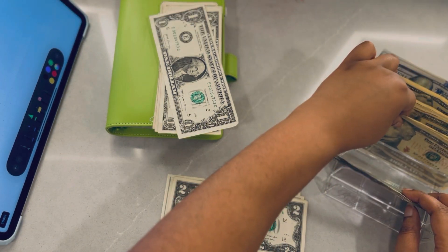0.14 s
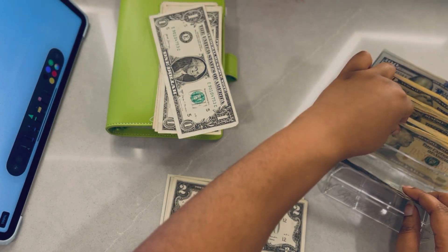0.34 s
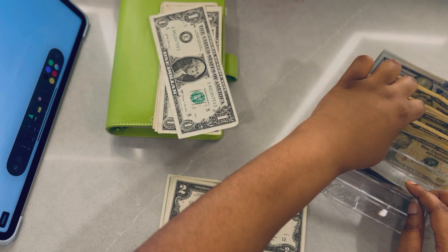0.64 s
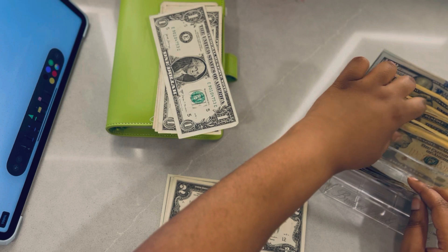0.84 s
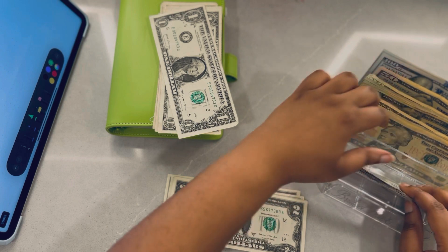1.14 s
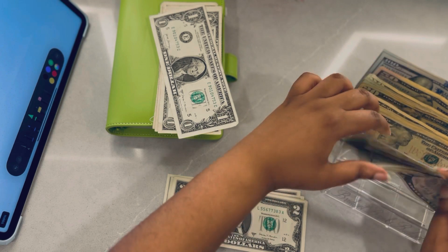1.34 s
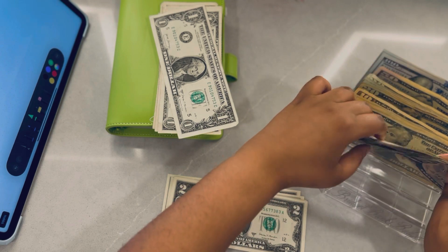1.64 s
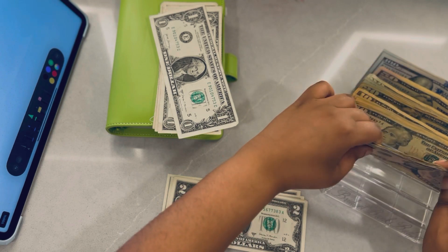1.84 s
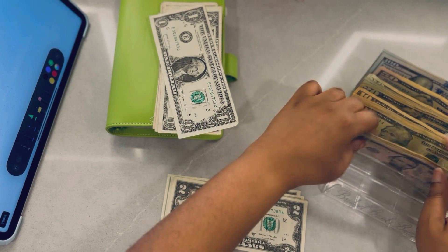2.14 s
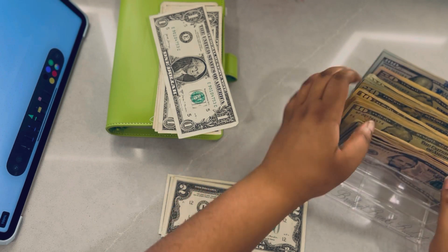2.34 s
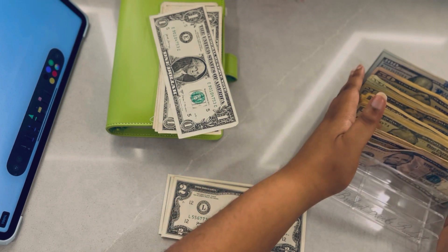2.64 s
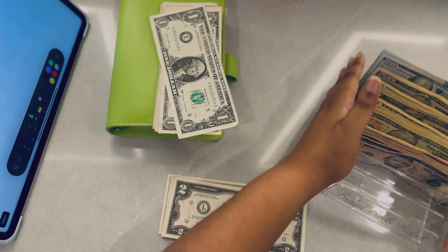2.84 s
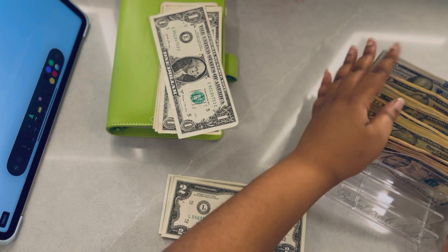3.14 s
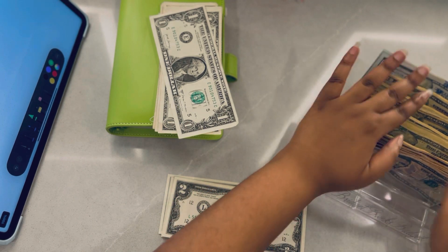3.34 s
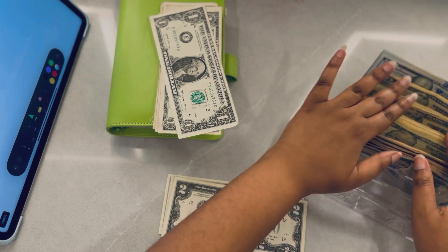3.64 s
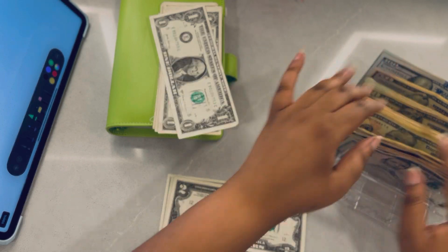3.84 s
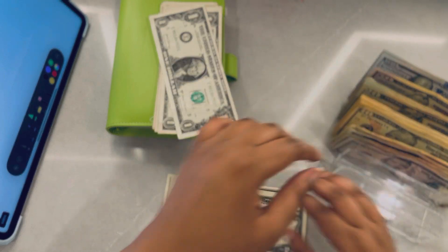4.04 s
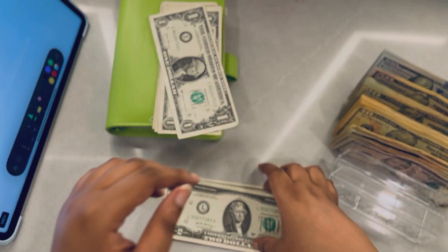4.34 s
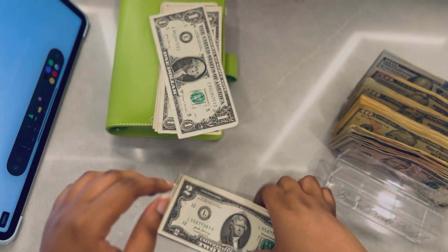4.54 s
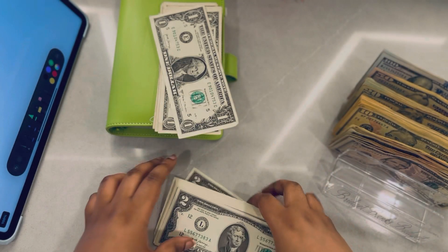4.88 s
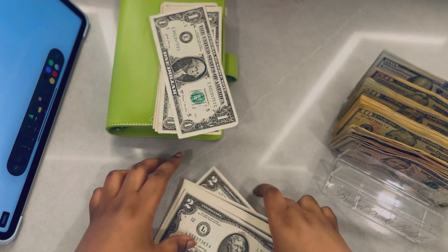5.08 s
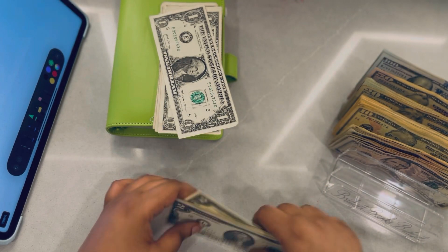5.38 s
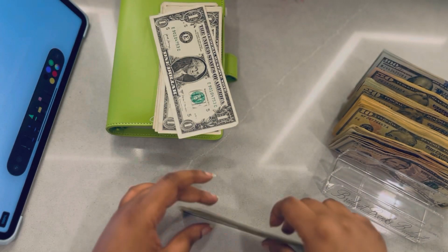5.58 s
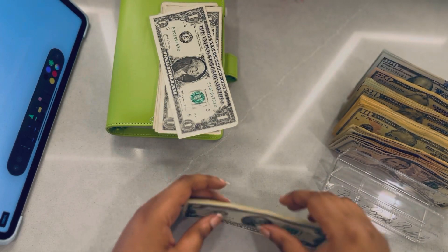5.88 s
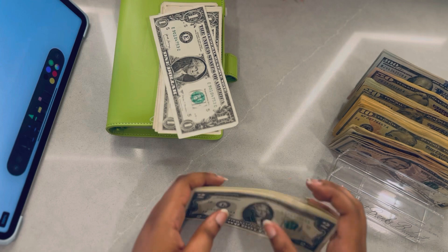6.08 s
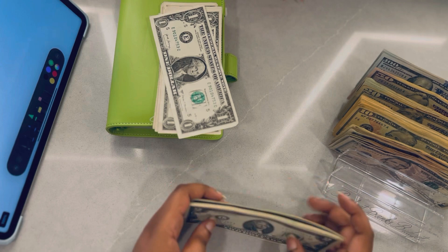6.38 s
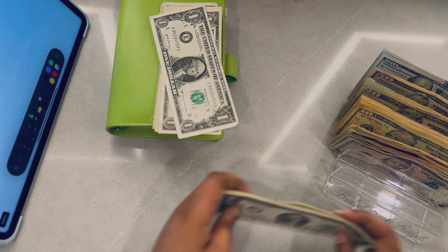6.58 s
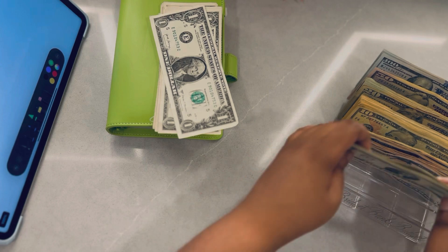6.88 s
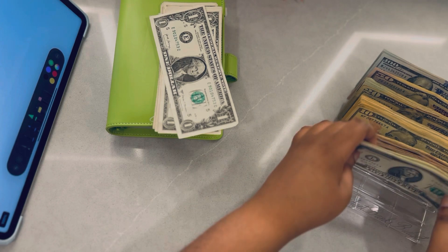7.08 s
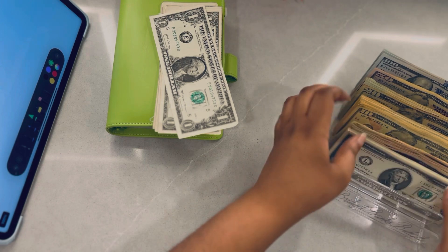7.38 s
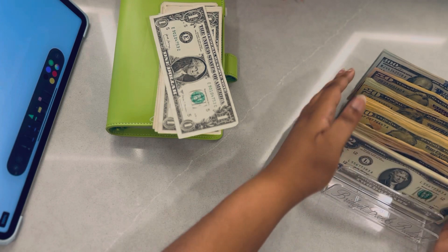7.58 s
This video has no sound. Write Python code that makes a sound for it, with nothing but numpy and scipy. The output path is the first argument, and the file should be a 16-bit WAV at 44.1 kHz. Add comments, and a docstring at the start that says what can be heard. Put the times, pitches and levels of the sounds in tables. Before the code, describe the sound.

A close stereo pickup in a bare, hard room with under a second of bright reverberation; a faint, low mains hum and still air run throughout. From 0 to 1.7 s there are only very soft paper slides and tiny ticks. A dull plastic knock comes at 1.8 s, then a sharp click at 2.15 s with the tray ringing briefly. Light paper brushes follow at 2.5-3 s, then distinct tray clicks at about 3.45 and 3.63 s. After a lull, soft thuds and quick papery flicks begin at 4.2 s, with a hollow stack tock at 5.03 s, a rustle at 5.3 s and a crisp snap cluster at 5.6 s. Fine crinkles and small flicks run from 5.9 to 6.5 s, then near quiet. At 7.19 s the loudest crack hits the plastic, with a thud, a paper slide and a fading ring.

```python
"""Sorting banknotes by hand

Banknotes are sorted on a hard counter in a bare, ringing room. Nails and note edges crack against a
plastic tray and set its walls ringing; notes snap in short noise bursts, and their stack gives a hollow tock.
Sliding paper rustles in swells of grainy noise with tiny crinkles. Hands bump the counter with soft
thuds, and an appliance hums faintly over the still air."""
import sys
import numpy as np
from scipy import signal
from scipy.fft import rfft, irfft, next_fast_len
from scipy.io import wavfile
from scipy.ndimage import uniform_filter1d, map_coordinates

SR = 44100
rng = np.random.default_rng(int(sys.argv[2]) if len(sys.argv) > 2 else 0)


def wrap_up_sound(samples):
    """Save the sound to the file named by the first command line argument, as 16-bit audio."""
    columns = np.atleast_2d(samples).T
    # keep every value between -1 and 1, then stretch to whole-number steps
    tamed = np.clip(columns, -1, 1)
    steps = np.round(tamed * 32767).astype(np.int16)
    wavfile.write(sys.argv[1], SR, steps)


N = 340405  # length in samples

# Nails and note edges on the tray: start_s, strength_db, knock_db, edge_db, crisp_db (these three
# against the strength), sizzle_db (over crisp), body_hz, rise_s, decay_s (to -60 dB),
# ring_db (low where a hand damps the walls), room_db (high where the blow faces away).
# Levels are relative; the function adds its own gains.
TRAY_HITS = [(1.8, -33.5, 2.5, -5.5, -5.5, 2, 710, 0.002, 0.022, -12, -0.88),
             (2.103, -51.5, -1, 0.5, 4, 19.5, 1100, 0.0028, 0.016, 8.5, 0),
             (2.1461, -25.5, -10.5, -4.5, 1, 16, 850, 0.0015, 0.041, 0, -1.3),
             (2.154, -28.5, 1.5, 10, 11, 4, 2030, 0.0021, .016, -3.5, -3.1),
             (3.283, -45.5, -7, .5, -8.5, 14.5, 1080, 0.004, 0.022, -1, 0.14),
             (3.4349, -36, -10, -2.5, -9, 0.5, 1880, 0.0017, 0.036, 5, -1),
             (3.446, -23.5, -9.5, -7, 3, 5, 1280, .0014, .02, -11, -1.6),
             (3.6307, -32, -4.5, 2.5, 3.5, 5.5, 2510, 0.0022, 0.03, 0, -1.7),
             (3.733, -42.5, -0.5, 0, -16, -1, 1580, 0.0029, 0.023, -1.5, -1),
             (7.1815, -37.5, -30.5, 1.5, -10, -10, 1160, 0.0015, .055, -2, -2),
             (7.1907, -10, -21, -4.5, 5, -1.5, 1230, 0.001, 0.0072, 1.5, -0.46),
             (7.198, -19, -10, -0.5, -15, -11, 1170, 0.0083, 0.045, 2.5, 0.95),
             (7.213, -24.5, -3, 0, -10, -15, 1360, 0.0087, 0.026, 0, 1.5),
             (7.236, -24.5, -16, 0.5, 2.5, -21, 1670, 0.011, 0.021, -1, 1.5)]
# Ringing tones of the plastic tray: pitch_hz, level_db (relative), decay_s (to -60 dB)
TRAY_TONES = [(213, -7.5, 0.52), (539, 1.5, 0.36), (880, -10, 0.78), (1091, -1, 0.59), (1188, -5, 0.39),
              (1248, -6, .58), (1570, -0.5, .65), (2360, -9.5, 0.59), (2946, -0.5, .6), (3050, 1.5, .7),
              (3170, 0.5, .6), (3655, -4.5, 0.35), (3730, -5, 0.61), (4110, -3.5, 0.68), (4600, -4, .62),
              (4696, -7.5, 0.6), (5117, -3.5, .6), (6278, -9, 0.36), (6460, -6, 0.29), (7670, -4, .6)]
# Broad resonances of the tray: pitch_hz, level_db
TRAY_COLOUR = [(400, -5), (540, -1.5), (680, -4.5), (880, -1.5), (1170, 1), (1420, 1.5), (1600, 3),
               (2000, 1.5), (2300, 3), (2650, -4.5), (3040, 5.5), (3420, -2), (3700, 1), (4100, .5),
               (5000, -2.5), (5550, -1.5), (6300, 1), (7100, -.5), (7800, -0.5), (9000, -1)]


def tray(gain_db=11.0, room_db=-3, ring_gain_db=-20.0):
    """Hard contacts crack and ring the tray's walls; the stack settles with slower, softer blows."""
    out = np.zeros((2, N))
    ring_onset = 1 - np.exp(-np.arange(SR) / SR / 0.00047)
    for (start_s, strength_db, knock_db, edge_db, crisp_db, sizzle_db,
         body_hz, rise_s, decay_s, ring_db, hit_room_db) in TRAY_HITS:
        bands_db = (knock_db, 0, edge_db, crisp_db, sizzle_db)
        colour = contact_colour(bands_db, body_hz, bulge_db=7, octaves=0.27)
        tray_colour = lambda hz: colour(hz) * amp(along(TRAY_COLOUR, hz))
        hit, radiated = crack(tray_colour, decay_s, rise_s, spread=0.65)
        # a crisp blow wakes the high tones
        struck = [(hz, db + 20 * np.log10(colour(hz)), life) for hz, db, life in TRAY_TONES]
        ringing = ring(struck, scatter_db=2.5, blur=5) * ring_onset
        hit_db = strength_db + gain_db
        add(out, start_s, amp(hit_db) * hit)
        add(out, start_s, amp(hit_db + room_db + hit_room_db) * reverberate(radiated))
        add(out, start_s, amp(strength_db + ring_gain_db + ring_db) * ringing)
    return out


# Flicks and taps of the notes: start_s, strength_db (relative, before the gain),
# knock_db (of the bundle), crisp_db, body_hz (where the buckling paper resonates), decay_s (to -60 dB)
NOTE_SNAPS = [(.797, -60.5, 3, -1, 1450, 0.039), (1.039, -61, -6, 2.5, 1800, 0.016),
              (1.336, -54, 3, -10, 1720, 0.035), (1.358, -49, 2.5, -20, 800, 0.021),
              (1.392, -58.5, 2, 11.5, 860, 0.016), (1.605, -62, 3, -15, 860, 0.053),
              (1.686, -63, 8, -16, 1300, 0.027), (1.709, -49.5, 4, -21, 724, 0.018),
              (1.7104, -52, -7.5, -26, 1940, 0.024), (2.588, -49, -12, -16, 2114, 0.045),
              (2.701, -49, -6.5, -23, 1600, 0.04), (2.89, -50.5, -9.5, -21, 1083, 0.039),
              (2.902, -54.5, -11.5, -10, 1290, 0.021), (2.974, -52.5, -11, -16, 1500, .025),
              (4.237, -45.5, -3, -18.5, 475, 0.018), (4.336, -47.5, -7, -17.5, 1810, 0.027),
              (4.369, -50, 7, -5, 450, .014), (4.471, -46, -13, -6.5, 1750, 0.021),
              (4.487, -36, -25, -6.5, 2090, 0.019), (4.504, -47.5, -7, -10, 1730, 0.023),
              (4.579, -52, -13, -12, 2690, 0.015), (4.654, -52, -14, -12.5, 1890, 0.018),
              (4.899, -48, -17, -9.5, 2100, 0.023), (4.946, -43.5, -31, -12.5, 2000, 0.022),
              (4.966, -57.5, -3, 5.5, 1686, 0.025), (5.025, -33, -3, -15, 2300, 0.028),
              (5.123, -47.5, -12, -14, 912, 0.02), (5.185, -49.5, -18, -11, 1655, 0.047),
              (5.562, -48, -6, -14, 2600, 0.026), (5.573, -40, -8, -3, 1460, .022),
              (5.593, -26.5, -11.5, -4.5, 1420, .025), (5.601, -37.5, -2, -2, 2320, 0.015),
              (5.6042, -33, -10.5, 7.5, 2070, 0.017), (5.6263, -41, -1, 2.5, 1395, 0.024),
              (5.677, -47, -5, 13.5, 2100, 0.011), (5.884, -35, -30, -12.5, 3230, 0.014),
              (6.126, -54, -25, -12, 2808, 0.047), (6.153, -53.5, -20, -11, 2860, 0.047),
              (6.232, -50.5, -21, -14, 2280, 0.017), (6.252, -41, -20, -19.5, 2610, 0.027),
              (6.334, -55, -9, -11, 1660, 0.037), (6.414, -43.5, -24, -23.5, 2450, 0.024),
              (6.436, -55.5, -10.5, -22, 1743, .02), (6.475, -59, -15.5, -1.5, 3000, 0.018)]
HOLLOW_FOLLOWS = 0.4  # share of a snap's knock dB that its lower mids take on
EDGE_FOLLOWS = 0.66  # share of its crispness dB that its upper mids take on
SIZZLE_DB = 8.5  # top octave, over the crispness
RISE_SHARE = 0.12  # rise time over decay time
# The stack's edge meets the counter: start_s, level_db (relative)
STACK_TAP = (5.028, -27)
# Hollow tones of the stack: pitch_hz, level_db (relative), decay_s (to -60 dB)
STACK_TONES = [(1680, 5, 0.02), (2440, 4.5, 0.017), (2930, -7, 0.018)]


def notes(gain_db=12.0, room_db=-4.0, tock_room_db=-9):
    """Stiff paper buckles and its edges tap the counter; the whole stack answers with a hollow tock."""
    out, to_room = np.zeros((2, N)), np.zeros(N)
    for start_s, strength_db, knock_db, crisp_db, body_hz, decay_s in NOTE_SNAPS:
        hollow_db, edge_db = HOLLOW_FOLLOWS * knock_db, EDGE_FOLLOWS * crisp_db
        bands_db = (knock_db, hollow_db, edge_db, crisp_db, SIZZLE_DB)
        colour = contact_colour(bands_db, body_hz, bulge_db=7.0, octaves=0.4)
        snap, radiated = crack(colour, decay_s, RISE_SHARE * decay_s, spread=0.5)
        add(out, start_s, amp(strength_db + gain_db) * snap)
        add(to_room, start_s, amp(strength_db + gain_db) * radiated)
    add(out, 0, amp(room_db) * reverberate(to_room))

    tap_s, tap_db = STACK_TAP
    onset = 1 - np.exp(-np.arange(SR) / SR / 0.0014)
    tock = amp(tap_db) * ring(STACK_TONES, scatter_db=0, blur=15) * onset
    add(out, tap_s, tock)
    add(out, tap_s, amp(tock_room_db) * reverberate(tock))
    return out


# Deliberate strokes of paper on paper: middle_s, length_s, rub_hz, rub_db, hiss_db
STROKES = [(.115, 0.058, 2350, -76, -91), (.325, .15, 1840, -55.5, -57.5), (.59, .15, 1560, -67, -74),
           (.785, .11, 1520, -61.5, -75), (1.157, .03, 1380, -69.5, -88), (1.23, .1, 1730, -69, -62),
           (1.384, .065, 895, -62, -56.5), (1.7, .16, 694, -68.5, -74), (1.8, .018, 557, -46, -54),
           (2.143, .014, 3200, -58.5, -56), (2.509, 0.042, 1490, -61, -62.5),
           (2.61, .042, 1707, -60.5, -72), (2.696, .06, 1770, -58, -85), (2.91, .06, 1253, -62.5, -69.5),
           (2.975, .045, 1550, -59, -73.5), (4.286, .025, 1598, -61.5, -69), (4.355, .025, 2000, -63, -67),
           (4.402, .04, 2000, -65, -66), (4.449, .04, 1820, -57, -61), (4.526, .045, 1870, -55.5, -53.5),
           (4.738, .04, 1520, -63.5, -66), (4.831, .08, 2230, -62.5, -58.5), (4.988, .03, 2000, -74, -58),
           (5.022, 0.037, 1760, -49, -50.5), (5.08, .07, 1900, -67.5, -59.5), (5.316, .115, 1730, -55, -52),
           (5.38, .03, 1120, -58.5, -60), (5.59, .03, 1500, -50, -51), (6.08, .04, 1750, -69.5, -64.5),
           (6.198, .03, 2380, -70.5, -70), (6.295, .05, 1700, -60, -69), (6.345, .04, 1700, -63, -72),
           (6.402, 0.036, 1880, -64.5, -75), (6.46, .06, 1970, -66, -80.5), (6.76, .09, 1300, -80, -88),
           (7.015, .06, 1235, -74, -91), (7.215, .22, 1610, -61, -61)]
# Tone of the rub: multiple of rub_hz, level_db (relative)
RUB = [(.15, -17.5), (.4, -10.5), (0.65, -3), (.9, -1), (1.45, -2.5), (1.85, -11), (4.001, -26)]
# Tone of the hiss: pitch_hz, level_db (relative)
HISS = [(1500, -21), (2700, -10), (3300, -3), (4700, -5.5), (5700, -1), (7400, -2), (9000, -8.5),
        (11300, -2), (12600, -32.5), (16000, -74.5)]
SHIFTS_PER_S, SHIFT_S, SHIFT_HZ = 10, 0.063, 1920  # small slides of fidgeting fingers: rate, length, rub pitch
SHIFT_HISS_DB = 3  # their hiss over their rub
CRINKLE_DB = 6.5  # crinkles over the rub


def rustle(grain_db=3.0, catch_db=2.5, room_db=-5, spread=0.69, taper=1.2):
    """Sliding fibres catch and slip: uneven swells of tiny clumped grains, with crinkles on top."""
    paper, t = np.zeros((2, N)), np.arange(SR // 3) / SR
    grains = [amp(grain_db * wobble(800) + catch_db * wobble(70)) for layer in range(2)]
    moves = fidgets(SHIFTS_PER_S, scatter_db=7.5)
    shifts = [(s, SHIFT_S, SHIFT_HZ, db, db + SHIFT_HISS_DB) for s, db in moves]
    for middle_s, length_s, rub_hz, rub_db, hiss_db in list(STROKES) + shifts:
        start_s = max(middle_s - length_s / 2, 0)
        first = round(start_s * SR)
        swell = np.abs(np.sin(np.pi * np.minimum(t / length_s, 1))) ** taper
        coarse, fine = [swell * grain[first:][:len(t)] * rng.standard_normal((2, len(t)))
                        for grain in grains]
        rub = coloured(coarse, [(rub_hz * ratio, db) for ratio, db in RUB])
        slide = amp(rub_db) * rub + amp(hiss_db) * coloured(fine, HISS)
        add(paper, start_s, slide * np.sqrt(np.mean(swell ** 2)))
        # row 0 becomes the middle of the stereo picture
        add(paper[0], start_s, amp(rub_db + CRINKLE_DB) * crinkles(length_s))
    paper = widen(paper, spread)
    return paper + amp(room_db) * reverberate(paper.mean(axis=0))[:, :N]


# Spells in which the fingers keep shifting the notes: start_s, end_s, level_db (middle of the spread)
FIDGETS = [(0.077, .5, -80), (4.4, 5.45, -71.5), (6.045, 6.55, -77), (6.697, 7.1, -86.5)]


def fidgets(rate, scatter_db):
    """Times and levels of small finger movements, loosely spaced through each spell."""
    moves = []
    for start_s, end_s, level_db in FIDGETS:
        slots = np.arange(start_s, end_s - 0.5 / rate, 1 / rate)
        for slot_s, (late, size) in zip(slots, rng.random((len(slots), 2))):
            moves.append((slot_s + late / rate, level_db + scatter_db * (2 * size - 1)))
    return moves


CRINKLES_PER_S, CRINKLE_SCATTER_DB = 96, 2  # rate of giving creases, spread of their sizes
CRINKLE_HZ, CRINKLE_OCTAVES = 2545, 0.55  # middle pitch and its spread
CRINKLE_CYCLES = 3.4  # cycles in which the ringing fades to about a third


def crinkles(length_s):
    """Tiny creases give way during a slide, each with its own pitch and size."""
    out, t = np.zeros(SR // 2), np.arange(SR // 100) / SR
    count = int(CRINKLES_PER_S * length_s) + 1
    for when, size, pitch in zip(rng.random(count), rng.random(count), rng.standard_normal(count)):
        cycles = CRINKLE_HZ * 2 ** (CRINKLE_OCTAVES * np.clip(pitch, -2, 2)) * t
        # many small creases, a few strong ones, strongest in mid-slide
        gain = np.sin(np.pi * when) * amp(-CRINKLE_SCATTER_DB * np.log(max(size, np.exp(-3))))
        envelope = np.exp(-cycles / CRINKLE_CYCLES) * (1 - np.exp(-2 * cycles)) ** 2
        add(out, when * length_s, gain * np.sin(2 * np.pi * cycles) * envelope)
    return out


# Hands and stack bumping the counter: start_s, level_db (relative),
# soft_hz (above it the soft blow fades)
BUMPS = [(1.79, -53, 397.6), (2.143, -53, 400), (4.238, -43, 497), (4.273, -42.5, 131), (4.369, -43.5, 446),
         (4.411, -53, 160), (4.5, -47.5, 206), (5.025, -41, 443), (5.065, -41.5, 199), (5.591, -41.5, 298),
         (5.377, -50.5, 451.4), (6.725, -53, 149.4), (6.775, -58.5, 147.6), (7.202, -37.5, 407)]
# Low tones of the counter: pitch_hz, level_db (relative), decay_s (to -60 dB)
COUNTER_TONES = [(82.5, 1, 0.41), (106.8, -0.5, 0.49), (141, -7.5, 0.14), (180, -6, 0.28),
                 (225.3, -2, 0.51), (253, -2, 0.37), (345, -7, 0.79)]
BEND_DELAY_S, BEND_HZ = 0.00789, 123  # travel time of bending waves at this pitch; higher ones come sooner


def bumps(ring_gain_db=-9.0, rise_s=0.01, thud_db=-1.5, room_db=-7):
    """A soft blow arrives as a quickly falling thud and leaves the counter's low tones ringing."""
    out = np.zeros((2, N))
    ring_onset = 1 - np.exp(-np.arange(SR) / SR / rise_s)
    bend = lambda hz: np.exp(-4j * np.pi * BEND_DELAY_S * np.sqrt(BEND_HZ * hz))
    bass_cut = lambda hz: hz ** 2 / (hz ** 2 + BEND_HZ ** 2)
    for start_s, level_db, soft_hz in BUMPS:
        pad = lambda hz: 1 / (1 + (hz / soft_hz) ** 4)
        thud = filtered(signal.unit_impulse(SR // 8), lambda hz: bend(hz) * pad(hz) * bass_cut(hz))
        thud = amp(level_db + thud_db) * thud / np.abs(thud).max()
        struck = [(hz, db + 20 * np.log10(pad(hz)), life) for hz, db, life in COUNTER_TONES]
        ringing = ring(struck, scatter_db=3.0, blur=6.8) * ring_onset
        add(out, start_s, thud)
        add(out, start_s, amp(room_db) * reverberate(thud))
        add(out, start_s, amp(level_db + ring_gain_db) * ringing)
    return out


# Tones of the mains hum: pitch_hz, level_db (about which it wavers)
HUM = [(120, -63.5), (240.5, -79.5), (361, -79.5)]
HUM_WAVER_DB, HUM_DRIFT_RAD, FLUTTER_DB = 1.6, 0.18, -71  # wander of level and phase, level of flutter
# Tone of the still air: pitch_hz, level_db (relative)
AIR = [(18, -41), (32, -16.5), (60, -8), (121, -9), (186, -14.5), (286, -19), (363, -19), (558, -26.5),
       (1240, -36.5), (1720, -29.5), (2630, -38), (7680, -52), (11000, -55.5), (12500, -86), (14000, -120)]


def background(air_db=-69):
    """A wavering mains hum, with noise fluttering around its lowest tone, over the still air."""
    t = np.arange(N) / SR
    hum = np.zeros(N)
    for hz, db in HUM:
        level = np.sqrt(2) * amp(db + HUM_WAVER_DB * wobble(17))
        hum += level * np.sin(2 * np.pi * hz * t + HUM_DRIFT_RAD * wobble(35.0))
    flutter_band = [(85, -52.0), (108, -4.5), (120, -5.5), (133, -11.0), (170, -47.0)]  # (Hz, dB)
    flutter = coloured(diffuse(N), flutter_band)
    return hum + amp(FLUTTER_DB) * flutter + amp(air_db) * coloured(diffuse(N), AIR)


def contact_colour(bands_db, body_hz, bulge_db, octaves):
    """Gain of a contact from dull knock to crisp top, with a bulge where the struck piece resonates."""
    knock, hollow, edge, crisp, sizzle = bands_db
    top = crisp + sizzle
    points = [(20, knock - 45), (80, knock - 11), (250, knock + 1), (380, knock - 1), (560, knock + 3),
              (800, hollow - 3), (1100, hollow - 3), (1700, -6),
              (2700, edge - 4), (4100, edge - 2), (5200, edge - 4.5),
              (6300, crisp - 1), (7800, crisp - 3), (9200, crisp - 9),
              (11300, top - 11), (13000, top - 26), (16000, top - 56)]
    bulge = lambda hz: bulge_db * np.exp(-(np.log2((hz + 1) / body_hz) / octaves) ** 2)
    return lambda hz: amp(along(points, hz) + bulge(hz))


def crack(colour, decay_s, rise_s, spread, smoothing=0.83):
    """A brief noise burst: the stereo sound heard directly, and a smoother one that feeds the room."""
    t = np.arange(SR // 8) / SR
    decay = amp(-60 * np.maximum(t - rise_s, 0) / decay_s)
    swell = decay * np.minimum(t / rise_s, 1) ** 2
    burst = rfft(rng.standard_normal((2, len(t))) * swell, 2 * len(t))
    # level out the broad spectrum so that the colour alone sets it
    even = burst / np.sqrt(np.abs(uniform_filter1d(np.abs(burst) ** 2, size=300)) + 1e-12)
    shape = colour(np.fft.rfftfreq(2 * len(t), 1 / SR)) * np.linalg.norm(swell)
    # the sum over all directions has shallower peaks and dips
    radiated = even[0] / (np.abs(even[0]) + 1e-9) ** smoothing
    return widen(irfft(even * shape)[:, :len(t)], spread), irfft(radiated * shape)[:len(t)]


def ring(tones, scatter_db, blur):
    """One second of ringing tones at new strengths; rattling contacts make their phases stray."""
    t = np.arange(SR) / SR
    knots = np.linspace(0, 1, num=200)
    out = np.zeros(SR)
    for hz, db, decay_s in tones:
        walk = np.cumsum(rng.standard_normal(len(knots))) / np.sqrt(len(knots))
        stray = blur * np.interp(t, knots, walk)  # radians; blur is the typical stray after 1 s
        level = amp(db + scatter_db * rng.normal() - 60 * t / decay_s)
        out += level * np.sin(2 * np.pi * (hz * t + rng.random()) + stray)
    return out


# How long the room rings: pitch_hz, decay_s (to -60 dB)
ROOM = [(100, 0.99), (300, 0.89), (1000, 0.92), (2000, 0.8), (4000, 0.8), (7000, 0.73), (10000, 0.53),
        (14000, 0.41)]
# What the walls send back: pitch_hz, reflected_db (relative)
WALLS = [(100, 5), (220, 0), (400, 3), (750, 0.5), (1150, 1.5), (1600, -3), (2200, -3), (3080, 2),
         (4300, 4), (5400, 4), (6500, -5), (10000, 3), (11600, -7.5), (12400, -37), (14000, -60)]


def reverberate(x, build_s=0.00044):
    """The room's answer: it builds up quickly and each frequency dies at its own speed."""
    hz, t, noise = signal.stft(diffuse(SR), SR, nperseg=256)
    fading = noise * amp(-60 * t / along(ROOM, hz)[:, None])
    tail = signal.istft(fading, SR, nperseg=256)[1][:, :SR]
    tail = tail * (1 - np.exp(-(np.arange(SR) / SR / build_s) ** 2))
    tail = filtered(tail / np.linalg.norm(tail[0]), lambda hz: amp(along(WALLS, hz)))
    return signal.fftconvolve(np.atleast_2d(x), tail, axes=1)


def diffuse(size):
    """Stereo noise that arrives from all sides."""
    return widen(rng.standard_normal((2, size)), 1)


# How alike left and right are in diffuse sound: pitch_hz, likeness (1 = the same)
ALIKE = [(120, 0.98), (300, 0.22), (600, 0.039), (1100, 0.3), (2200, 0.85), (4500, 0.42), (7000, 1),
         (10000, 0.78), (12000, 1)]


def widen(pair, spread):
    """Two unrelated signals become left and right, most alike in the bass and the high treble."""
    turn = lambda hz: spread * np.arccos(np.clip(along(ALIKE, hz), -1, 1)) / 2
    mid, side = filtered(pair, lambda hz: np.array([np.cos(turn(hz)), np.sin(turn(hz))]))
    return np.array([mid + side, mid - side])


def amp(db):
    """Decibels to gain."""
    return 10 ** (np.asarray(db) / 20)


def unit(x):
    """x scaled to an rms of 1."""
    return x / np.sqrt(np.mean(x ** 2) + 1e-20)


def along(points, hz):
    """(Hz, value) points read on a log frequency axis."""
    f, v = np.transpose(points)
    return np.interp(np.log(hz + 1), np.log(f + 1), v)


def wobble(rate):
    """A smooth random curve through `rate` random points a second."""
    points = rng.standard_normal(int(N * rate / SR) + 4)
    return map_coordinates(points, [np.arange(N) * rate / SR])


def filtered(x, response):
    """x with each frequency multiplied by the response there."""
    n = x.shape[-1]
    m = next_fast_len(n + 2048)
    return irfft(rfft(x, m) * response(np.fft.rfftfreq(m, 1 / SR)), m)[..., :n]


def coloured(x, points):
    """x filtered by (Hz, dB) points, then scaled to an rms of 1."""
    return unit(filtered(x, lambda hz: amp(along(points, hz))))


def add(track, start_s, sound):
    """Mix a sound into the track, cutting what runs past the end."""
    part = track[..., round(start_s * SR):][..., :sound.shape[-1]]
    part += sound[..., :part.shape[-1]]


def scene():
    """Everything on and around the counter."""
    return tray() + notes() + rustle() + bumps() + background()


# How far the left port leads the right: pitch_hz, lead_rad
PORT_PHASE = [(2000, 0), (4000, 1), (5000, -1.5), (5600, -2.5), (7300, 0.96), (10000, -2.08), (12300, -2.5)]
# How much louder the left port is than the right: pitch_hz, difference_db
PORT_BALANCE = [(60, 1), (400, -3), (1000, -1.5), (2000, 0), (4000, 0.5), (8000, 0)]
LOW_CUT_HZ, TOP_HZ = 31, 16000  # the microphone's bass roll-off and its band limit


def record(dry):
    """Two microphone ports that fall out of phase in the treble, a bass roll-off and a band limit."""
    half = np.array([[1], [-1]]) / 2  # each port takes half of the difference
    balance = lambda hz: amp(half * along(PORT_BALANCE, hz))
    phase = lambda hz: np.exp(1j * half * along(PORT_PHASE, hz))
    ports = filtered(dry, lambda hz: balance(hz) * phase(hz))
    return filtered(ports, lambda hz: (hz < TOP_HZ) * hz ** 4 / (hz ** 4 + LOW_CUT_HZ ** 4))


dry = scene()
out = record(dry)
wrap_up_sound(out)
```